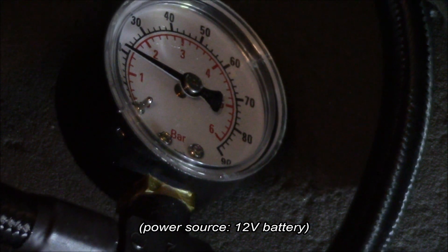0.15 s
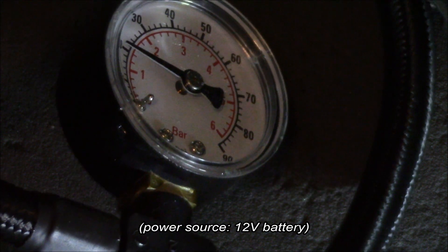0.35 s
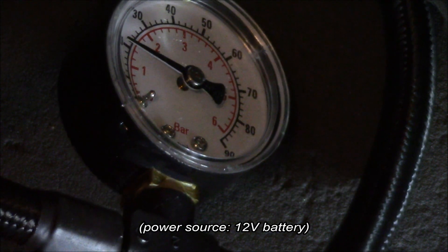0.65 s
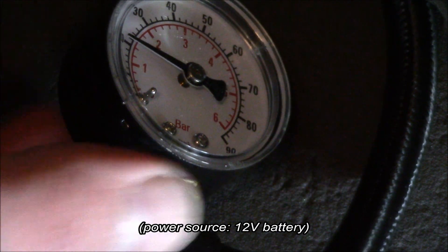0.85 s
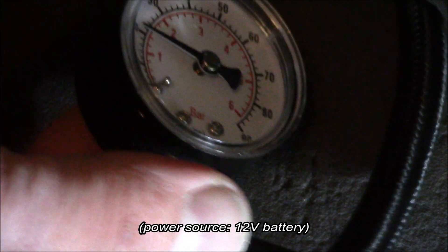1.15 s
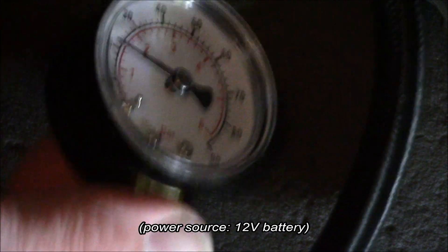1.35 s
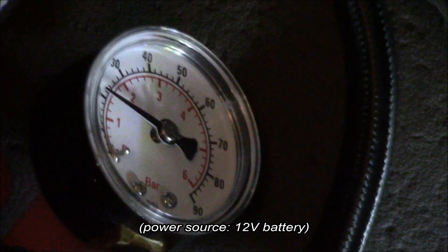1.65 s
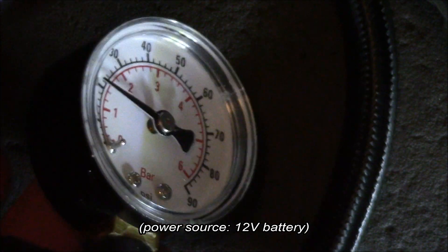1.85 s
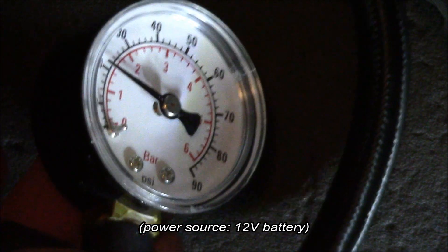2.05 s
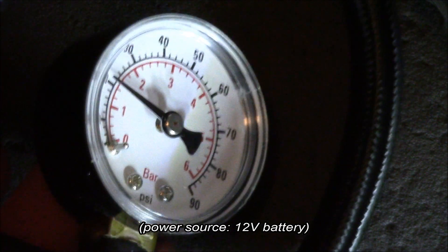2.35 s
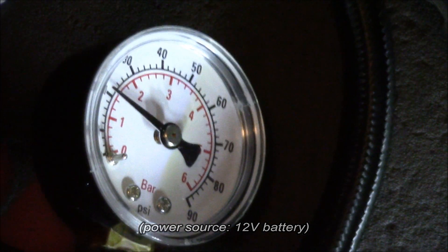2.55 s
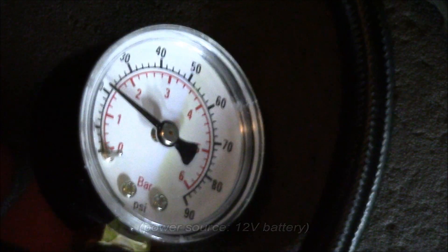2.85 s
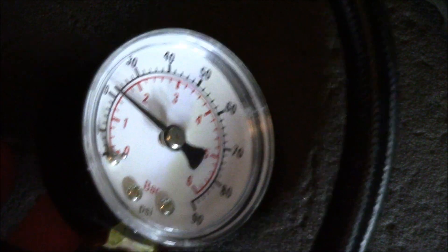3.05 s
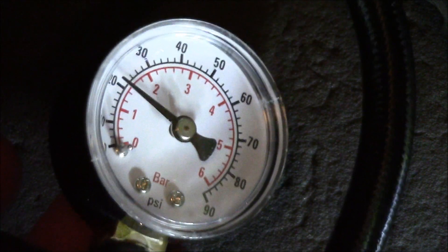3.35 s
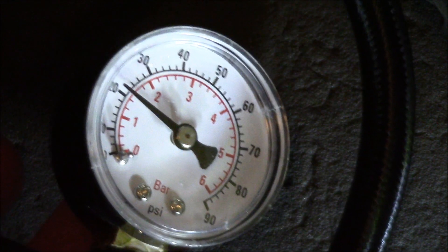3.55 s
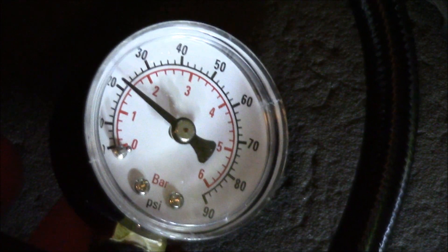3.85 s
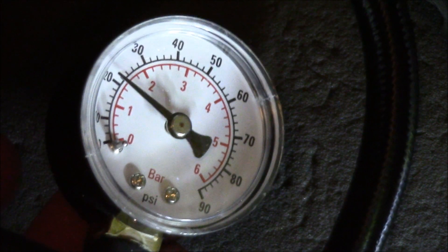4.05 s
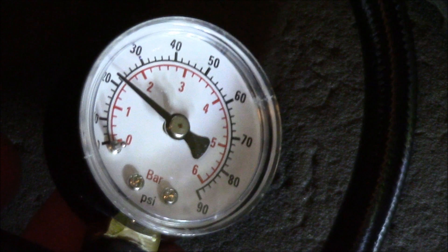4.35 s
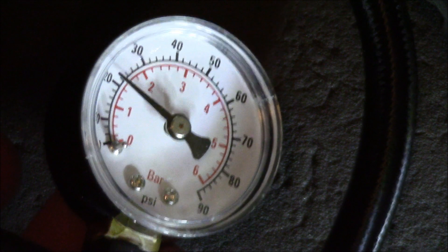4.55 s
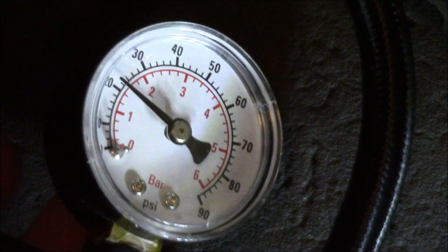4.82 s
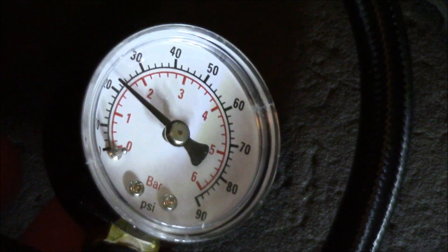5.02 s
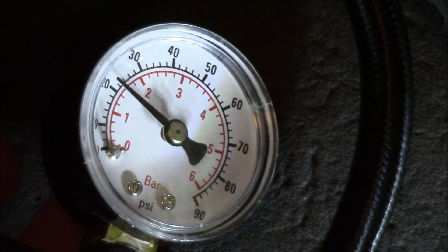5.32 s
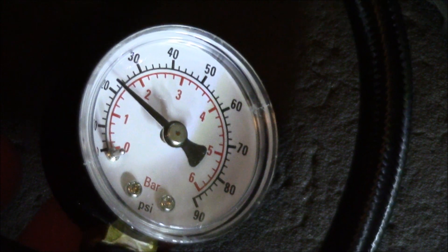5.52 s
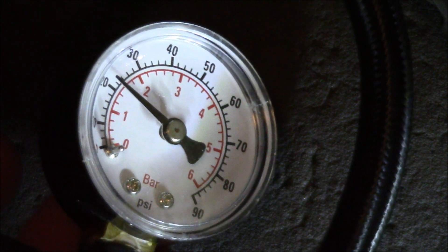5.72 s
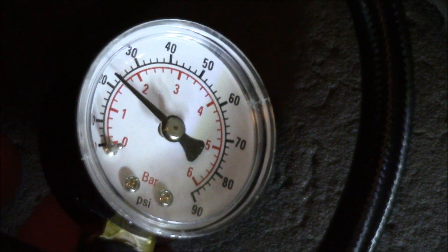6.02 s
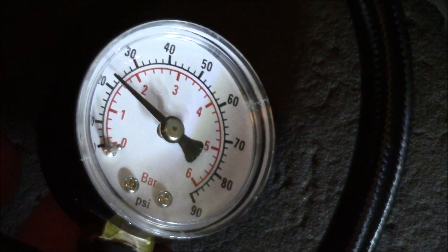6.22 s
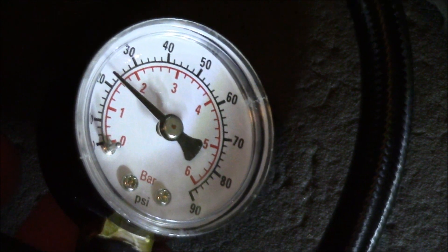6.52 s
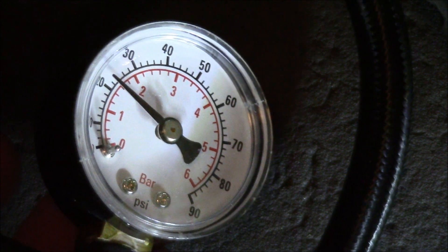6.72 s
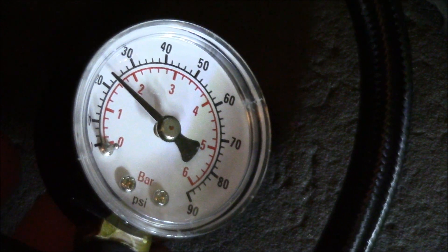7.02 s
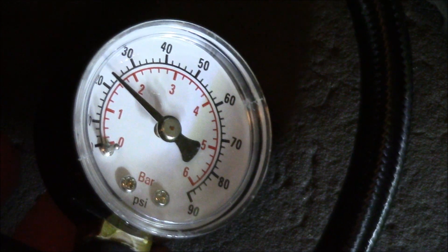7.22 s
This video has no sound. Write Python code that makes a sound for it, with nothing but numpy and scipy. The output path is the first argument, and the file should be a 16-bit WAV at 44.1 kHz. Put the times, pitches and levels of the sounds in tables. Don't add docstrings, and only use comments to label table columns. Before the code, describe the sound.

Continuous rattling buzz of a small electric air compressor at close range, its whining gears and clattering casing changing tone as a hand grips it.

```python
import sys
import numpy as np
from scipy import signal
from scipy.fft import rfft, irfft
from scipy.io import wavfile
from scipy.ndimage import uniform_filter1d

SR = 44100
rng = np.random.default_rng(int(sys.argv[2]) if len(sys.argv) > 2 else 0)


def int16_out(signal):
    q = np.round(np.clip(np.atleast_2d(signal).T, -1, 1) * 32767)
    wavfile.write(sys.argv[1], SR, q.astype(np.int16))


def ratio(d):
    e = np.asarray(d, float) / 20
    return 10 ** e


N = 325458
WHEEL, PINION = 52, 11


def level(x, db):
    return x * ratio(db) / np.sqrt(np.mean(x ** 2))


def causal(db, size=8192):
    cep = irfft(np.log(ratio(db)), size)
    cep[1:size // 2] *= 2
    cep[size // 2 + 1:] = 0
    return np.exp(rfft(cep))


def colour(x, points, modes=(), size=8192):
    hz = np.arange(size // 2 + 1) * SR / size + 1
    point_hz, point_db = np.transpose(points)
    db = np.interp(np.log(hz), np.log(point_hz), point_db)
    for centre, width, top in modes:
        db = db + top / (1 + (2 * (hz - centre) / width) ** 2)
    response = irfft(causal(db, size=size), size)[:size // 2]
    return signal.fftconvolve(x, response)[:N]


def band(x, lo_hz, hi_hz):
    return signal.sosfilt(signal.butter(2, [lo_hz, hi_hz], "band", fs=SR, output="sos"), x)


def per_turn(turn, values, smooth=60):
    return uniform_filter1d(values[turn.astype(int)], int(smooth))


def unevenness(turn, beat_db, scatter_db, lag):
    n = np.arange(int(turn[-1]) + 1)
    beat = np.cos(2 * np.pi * (n * WHEEL / PINION - lag))
    return per_turn(turn, beat_db * beat + scatter_db * rng.standard_normal(len(n)))


def round_turn(turn, moments, base_db):
    angle = np.arange(512) / 512
    power = ratio(base_db) ** 2
    for at, width, db in moments:
        distance = (angle - at + .5) % 1 - .5
        power = power + ratio(db) ** 2 * np.exp(-(distance / width) ** 2)
    return np.sqrt(power)[(turn % 1 * 512).astype(int)]


# time in seconds, speed in Hz.
CRANK_SPEED = [(0.0, 54.375), (0.87, 54.293), (1.11, 54.472), (1.34, 53.607), (1.58, 54.123),
               (2.17, 53.801), (2.32, 53.398), (2.96, 53.132), (3.11, 53.182), (4.07, 52.844),
               (4.22, 52.595), (5.14, 52.71), (5.33, 52.256), (5.48, 52.519), (6.52, 52.391),
               (6.71, 52.617), (6.87, 52.22), (7.38, 52.235)]


def crank(t):
    free_hz, full_hz = 54.4, 52.4
    wobble_turns, wobble_hz = .005, 3.5
    speed = np.interp(t, *np.transpose(CRANK_SPEED))
    wobble = level(band(rng.standard_normal(N), wobble_hz / 4, wobble_hz), 0)
    turn = .178 + np.cumsum(speed) / SR + wobble_turns * wobble
    load = np.clip((free_hz - uniform_filter1d(speed, SR)) / (free_hz - full_hz), 0, 1)
    return turn, load


# time in seconds, grip from 0 to 1.
THUMB_GRIP = [(0, 0), (.5, 0.53), (.9, .95), (1.25, 1), (1.6, .75), (2.4, 0.3), (3.0, 0.47), (7.38, 0.58)]


def thumb(t):
    firm_from = .75
    grip = np.interp(t, *np.transpose(THUMB_GRIP))
    return grip, np.clip((grip - firm_from) / (1 - firm_from), 0, 1)


def grains(turn, spread_db, repeat):
    def fresh(count):
        size_db = spread_db * rng.standard_normal(count // 24 + 1)
        return rng.standard_normal(count) * ratio(size_db.repeat(24)[:count])
    worn = np.interp(turn % 1 * 840, np.arange(841), fresh(count=841))
    share = np.clip(repeat, 0, .12)
    return np.sqrt(share) * level(worn, 0) + np.sqrt(1 - share) * level(fresh(count=N), 0)


# crank angle in turns, half width in turns, level in dB.
PISTON_SLAP = [(.46, .07, 3), (.63, .12, -6)]
LOOSE_PARTS = [(.9, .12, -4), (.29, .06, -4), (.45, .06, -4)]
VALVE_AIR = [(.95, .1, 0), (.1, .07, -.5), (.31, .08, -1.5)]


def forces(turn, load):
    slap_db = 5 - 5 * load + unevenness(turn, 0.56, 0.43, 0.091)
    clatter_db = -1 + 2.8 * load + unevenness(turn, 0.13, 0.23, 0.059)
    hiss_db = -.5 + 2.1 * load + unevenness(turn, 0.53, 0.45, 0.78)
    slap = band(grains(turn, 0.36, 0), 53, 750) / 3 + band(grains(turn, 0.62, 0), 588, 847)
    clatter = band(grains(turn, 0.98, 0.24), 992, 3220)
    hiss = band(grains(turn, 0.7, 0.28), 4250, 22000)
    out = slap * round_turn(turn, PISTON_SLAP, -16) * ratio(slap_db)
    out = out + clatter * round_turn(turn, LOOSE_PARTS, -2) * ratio(clatter_db)
    return out + hiss * round_turn(turn, VALVE_AIR, -4.5) * ratio(hiss_db)


# frequency in Hz, density in dB per Hz.
HELD_COLOUR = [(35, -47), (60, -55), (96, -43.5), (377, -8.5), (674, -0.5), (1290, -16.5), (1630, -15),
               (2480, -17.5), (2780, -18), (3270, -17.5), (5590, -17), (5990, -21), (11200, -21.5),
               (15600, -35)]
RESTING_COLOUR = [(35, -56), (60, -61.5), (313, -6), (368, -4.5), (572, -3.5), (850, -3.5), (1000, -4.5),
                  (2420, -16.5), (2780, -11), (3200, -17.5), (3850, -14), (6280, -20), (10500, -18),
                  (15600, -31.5)]
# frequency in Hz, width in Hz, gain held in dB, gain at rest in dB.
CASING_MODES = [(668, 167, 4, 12), (1103, 61, 13, 3.5), (1410, 290, 7, 2), (1631, 197, 5.5, 6),
                (2170, 300, 6, 7.5), (2740, 260, -4, -5), (3050, 300, 8, 4.5), (3405, 160, 7, 7),
                (3807, 290, 7, 8), (4153, 98, 7.5, 8.5), (5080, 670, 2.5, 7.5), (5580, 240, 2, 3),
                (6740, 240, 0, -2.5), (8170, 450, 6, 5.5), (9070, 120, 0, -4.5), (10600, 540, 5.5, 5),
                (11500, 450, 6, 3.5), (12270, 370, 7, 9.5)]
# time in seconds, gain in dB.
CAMERA_NEARNESS = [(0, 1.5), (.6, 0), (1.6, -.3), (3, -0.34), (4.2, -0.5), (7.38, 0.2)]


def casing(shake, t, firm):
    modes = np.array(CASING_MODES)
    held = level(colour(shake, HELD_COLOUR, modes[:, [0, 1, 2]]), -20.0)
    resting = level(colour(shake, RESTING_COLOUR, modes[:, [0, 1, 3]]), -21.5)
    hollow_hz, hollow_db = 6700, -2
    held = held + firm * ratio(hollow_db) * band(held, hollow_hz - 200, hollow_hz + 200)
    rest = np.interp(t, [1.3, 2.2], [0, 1])
    return (held * (1 - rest) + resting * rest) * ratio(np.interp(t, *np.transpose(CAMERA_NEARNESS)))


# crank angle in turns, half width in turns, level in dB.
TOOTH_LOAD = [(.08, .06, 3), (.19, .08, -5), (.6, .1, -12), (.93, .1, -9)]
# frequency in Hz, width in Hz, gain in dB.
GEAR_PLATE = [(2615, 70, 9), (2755, 330, 22), (5550, 340, 16), (8250, 300, 4), (10500, 500, 4)]


def gear(turn, load, grip, firm):
    sway_turns, droop_turns = np.interp(load, [0, 1], [-.0044, .0007]), .0015
    wheel = turn + sway_turns * np.sin(2 * np.pi * (turn - .09))
    wheel = wheel + droop_turns * np.cos(2 * np.pi * (turn - .1))
    tone_db = [-0.5, -9.5 + 4 * firm, -27, -13]
    teeth = 0
    for k, db in enumerate(tone_db, 1):
        teeth = teeth + ratio(db) * np.exp(2j * np.pi * k * WHEEL * wheel)
    pinion = 1 + 0.097 * np.cos(2 * np.pi * (turn * WHEEL / PINION - .2))
    play_in_phase = level(band(rng.standard_normal(N), 30, 300), -20)
    play_across = level(band(rng.standard_normal(N), 30, 300), -20)
    play = play_in_phase + 1j * play_across
    force = (teeth * (pinion + play)).real * round_turn(turn, TOOTH_LOAD, -19)
    whine = level(colour(force, [(100, 0), (16000, 0)], GEAR_PLATE), 0)
    return whine * ratio(-35 + 8 * grip)


HOLD_TIMES = [
    1.1,
    2.5,
    4.1,
]
# multiple of crank speed, level held in dB, shifted in dB, at rest in dB.
STROKE_TONES = [(1, -70.5, -72.3, -70.9), (2, -51.4, -54.5, -54.0), (3, -54.3, -57.5, -58.8),
                (4, -52.1, -57.7, -56.4), (5, -49.7, -49.9, -46.6), (6, -44.6, -44.5, -43.7),
                (7, -50.0, -57.0, -66.1), (8, -39.8, -43.5, -46.3), (9, -35.3, -35.1, -34.5),
                (10, -33.1, -32.8, -30.2), (11, -35.9, -33.1, -29.6), (12, -32.6, -41.8, -34.0),
                (13, -32.2, -33.1, -34.3), (14, -42.2, -54.4, -49.8), (15, -33.7, -36.6, -35.0),
                (16, -44.7, -47.5, -49.0), (17, -39.2, -41.9, -44.5), (18, -37.8, -40.5, -40.2),
                (19, -39.4, -38, -31.2), (20, -43.8, -40.6, -41.3), (21, -49.3, -47.1, -45.6),
                (22, -38.1, -41.5, -42.1), (23, -50.1, -44.8, -42.7), (24, -51.8, -43.9, -48.1),
                (25, -50.9, -50.7, -47.4), (26, -49.0, -42.7, -39.2), (27, -48.3, -48.2, -42.9),
                (28, -60.3, -49.5, -41.1), (29, -46.2, -46.6, -44.7), (30, -58.3, -53.5, -47.9)]
TONE_ARRIVAL = [(0, .24, 0), (6, .6, .13), (8, .3, .04), (11, .56, .2), (13, .22, .02), (17, .4, .02),
                (24, .3, .03)]


def stroke(turn, t):
    order, *holds = np.transpose(STROKE_TONES)
    arrival = np.array(TONE_ARRIVAL)
    row = np.searchsorted(arrival[:, 0], order - .5) - 1
    first, arrives, slope = arrival[row].T
    late = np.cumsum(arrives + slope * (order - 1 - first)) - .53
    angle = turn + 0.0017 * unevenness(turn, 2.4, 0.71, 0.25)
    out = 0
    for k, lag, tone_db in zip(order, late, np.transpose(holds)):
        gain = np.sqrt(2) * ratio(np.interp(t, HOLD_TIMES, tone_db))
        out = out + gain * np.cos(2 * np.pi * (k * angle - lag))
    knock = band(out, 860, 4000)
    return out + knock * (ratio(unevenness(turn, 0.69, 1.4, 0.041)) - 1)


# multiple of motor speed, crank sideband number, level in dB.
MOTOR_TONES = [(1, -1, -66), (1, 0, -51.5), (1, 1, -55), (3, -3, -52), (3, -2, -49), (3, -1, -39.5),
               (3, 0, -34.5), (-1, 16, -42), (1, 4, -47), (1, 5, -46)]


def motor(turn):
    spin = turn * WHEEL / PINION - .11
    loaded = turn - .4
    out = 0
    for multiple, sideband, db in MOTOR_TONES:
        phase = round(multiple) * spin + round(sideband) * loaded
        out = out + np.sqrt(2) * ratio(db) * np.cos(2 * np.pi * phase)
    return out


# frequency in Hz, side minus mid in dB.
STEREO_DIFFERENCE = [(30, -60), (200, -42), (450, -28), (750, -44), (1200, -25), (2500, -17), (2900, -45),
                     (4000, -23), (8500, -13), (14000, -22)]


def left_right(mid):
    shaken = level(band(rng.standard_normal(N), 8, 60), 0)
    side = colour(shaken * mid, STEREO_DIFFERENCE)
    return np.array([mid + side, mid - side])


def scene():
    t = np.arange(N) / SR
    turn, load = crank(t)
    grip, firm = thumb(t)
    body = casing(forces(turn, load), t, firm)
    whine = gear(turn, load, grip, firm)
    return left_right(body + whine + stroke(turn, t) + motor(turn))


def roll_off(x):
    return signal.sosfilt(signal.butter(12, 15700, fs=SR, output="sos"), x)


def record(dry):
    mix = np.tanh(1.69 * dry) / 1.592
    return roll_off(mix)


dry = scene()
out = record(dry)
int16_out(out)
```